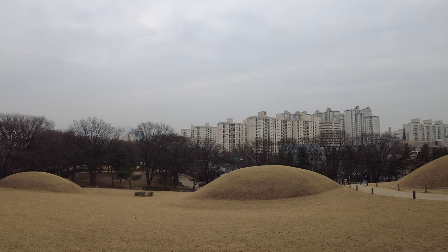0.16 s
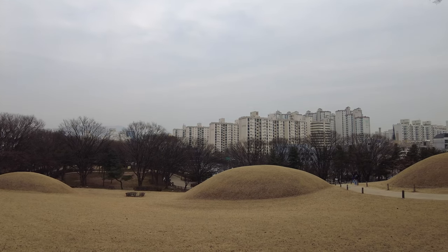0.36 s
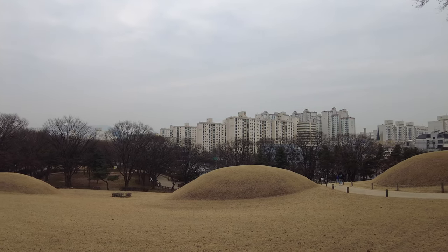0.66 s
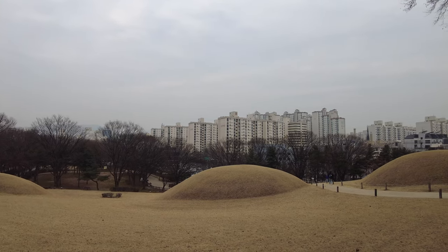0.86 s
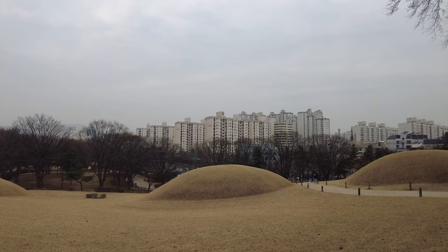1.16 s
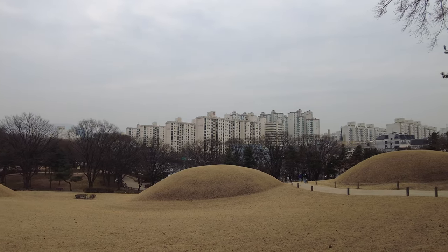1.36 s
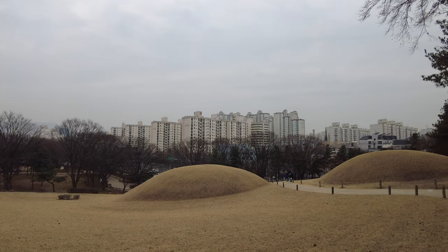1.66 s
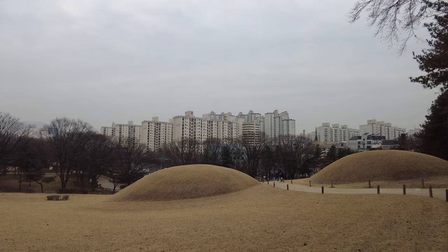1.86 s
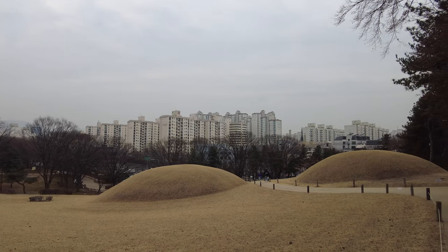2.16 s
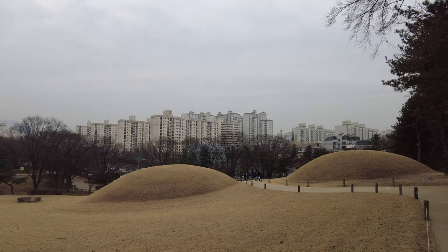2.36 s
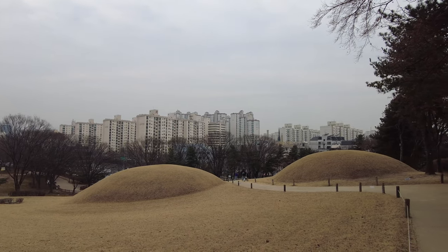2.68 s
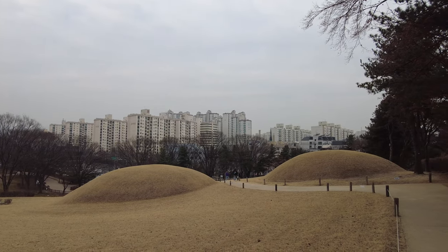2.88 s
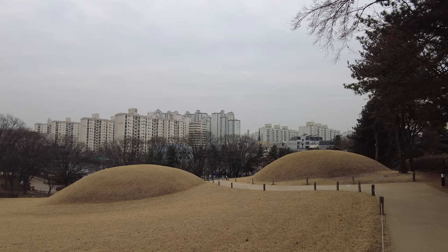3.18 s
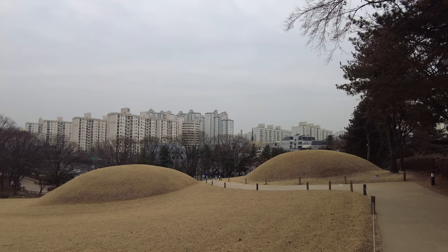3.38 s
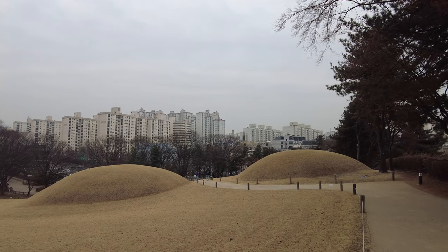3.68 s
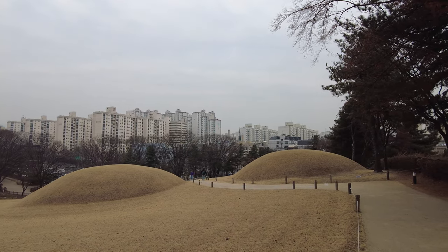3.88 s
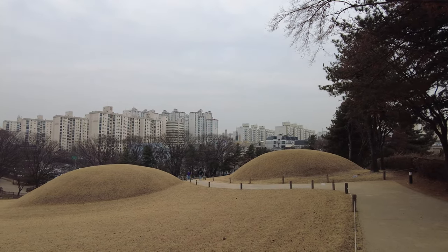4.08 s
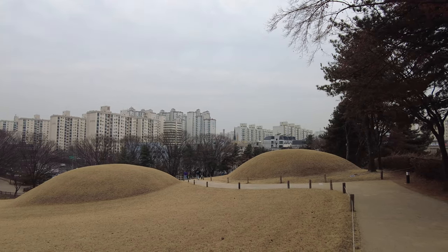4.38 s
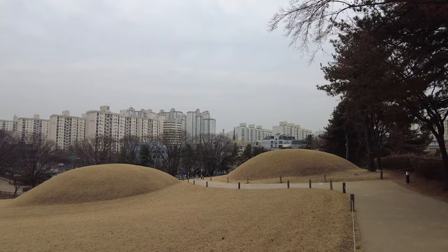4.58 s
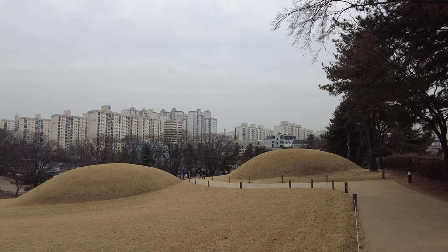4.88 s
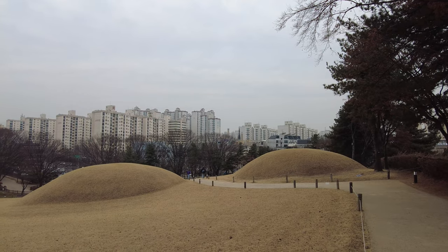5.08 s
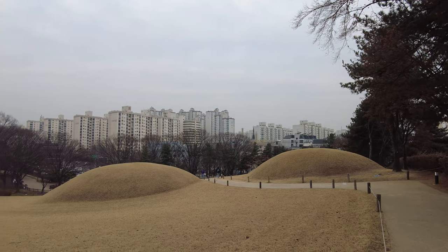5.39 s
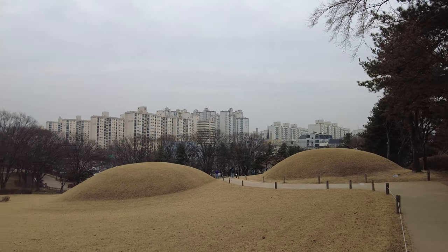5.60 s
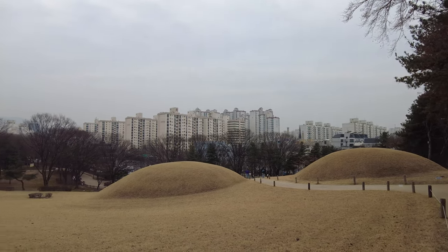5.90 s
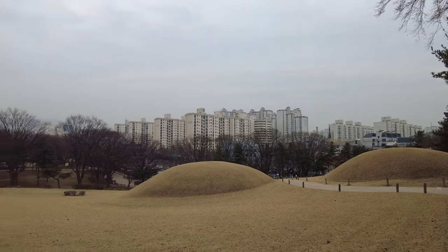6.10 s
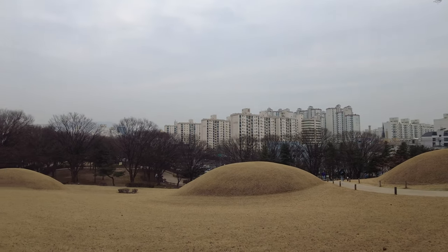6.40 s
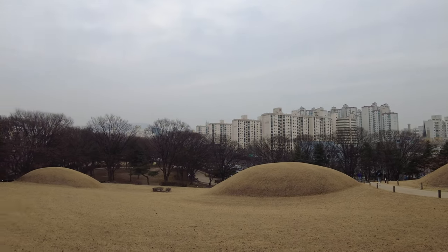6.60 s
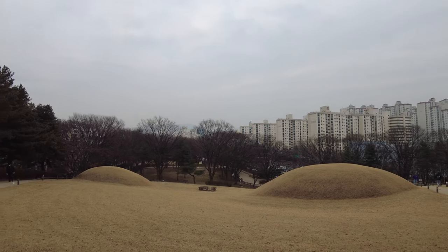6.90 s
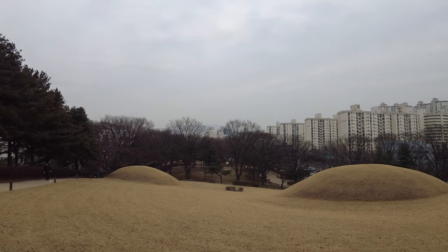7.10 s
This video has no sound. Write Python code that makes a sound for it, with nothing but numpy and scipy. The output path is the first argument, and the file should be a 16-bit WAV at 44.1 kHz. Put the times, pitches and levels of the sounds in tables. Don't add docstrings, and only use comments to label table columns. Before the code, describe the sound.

Outdoors in an open park, a hand-held stereo microphone picks up a continuous, bass-heavy rumble of distant traffic. Low engine drones flutter and fade, and the roar swells gently in the second half. A small bird whistles early; near two seconds fine metal tags jingle faintly. Sparse grit ticks, slight cloth rustle and a few short chirps follow, with soft gear whines and heavier lorry drones near the end.

```python
import sys
import numpy as np
from scipy import signal
from scipy.fft import rfft, irfft, next_fast_len
from scipy.io import wavfile
from scipy.ndimage import uniform_filter1d

SR = 44100
rng = np.random.default_rng(int(sys.argv[2]) if len(sys.argv) > 2 else 0)


def waveform_to_disk(signal):
    frames = np.transpose(np.atleast_2d(signal))
    scaled = np.clip(frames, -1, 1) * 32767
    samples = np.round(scaled).astype(np.int16)
    wavfile.write(sys.argv[1], SR, samples)


def attenuation_scalar(level_db):
    decades = np.asarray(level_db, float) / 20
    return 10 ** decades


N = 319725

# frequency in Hz, mid level in dB per Hz, side level in dB
# per Hz, share of the side in phase with the mid (-1 to 1), share in quadrature (-1 to 1).
ROAR_SPECTRUM = [(21.3, -55, -67.5, -0.82, -0.43), (35.7, -55, -72, -.9, -0.5), (43, -62, -76, -.9, -.3),
                 (62, -63, -79.5, -.6, -.3), (77.4, -63.5, -82.5, -0.19, -0.48),
                 (124, -68.5, -83, -.07, 0.64), (207, -73, -83, -0.15, -0.69),
                 (292.6, -78.5, -87.5, .03, -0.26), (485, -85.5, -90, 0, -0.4), (640, -88, -89, .2, -0.26),
                 (950, -89.5, -84.5, .16, -0.12), (1180, -93.5, -88, 0.28, -0.1),
                 (1214, -87, -94.5, 0.17, 0.1), (1696, -91, -95.5, -0.16, -0.45),
                 (2347, -101.5, -102.5, -.16, -0.7), (2925, -103, -104, -0.22, -.25),
                 (3800, -110.5, -111.5, -.12, -.1), (4300, -111.5, -110.5, -.2, 0),
                (5000, -115, -116, -.2, 0), (6700, -120.5, -121, -.13, 0), (7000, -122, -127, -.1, 0),
                (7700, -122.5, -124, -.1, 0), (8600, -124.5, -130, -.1, 0), (9400, -127, -127, -.1, 0),
                (12700, -128.5, -133, -.1, 0), (12790, -143, -138, 0, 0), (14200, -137, -131, 0, 0),
                (14330, -122, -116, -.1, .2), (14930, -121.5, -118, -.1, .2), (15020, -136, -119, 0, 0)]
# time in seconds, level in dB.
FLOW = [
    (0, -0.5),
    (.7, -1.5),
    (1.4, -1.5),
    (2.4, -0.8),
    (3.5, 0.6),
    (4.2, 0.94),
    (4.9, 0.5),
    (5.6, 1.26),
    (6.2, 1.4),
    (7.25, 1),
]
# their frequencies in Hz, then how far each follows the flow (1 = fully).
FLOW_HZ = [200, 700, 1800, 6000]
FLOW_SHARE = [0.74, 1.05, 1.3, 0.6]
# time in seconds, activity (no unit).
TREBLE_ACTIVITY = [(0, -1.2), (1.72, -1.1), (1.8, 1.2), (1.97, 1.6), (2.05, -.9), (4, -.9), (4.3, .3), (5.4, .3),
                   (5.55, 1), (5.7, .4), (6.5, .5), (6.6, 1.3), (6.75, 0), (7.0, .6), (7.25, .8)]
TREBLE_EDGES_HZ = [12750, 13500, 14250, 15000, 15720]
# start in seconds, peak in dB, left minus right in dB, pitch in Hz.
GRIT = [(1.79, -68, 0, 10000), (1.884, -67, 1, 6200), (1.93, -67, 1, 6500), (1.946, -70, 0, 9000),
        (3.148, -65, -1, 8000), (3.459, -67, 4, 5200), (3.692, -67, -2, 6500), (3.772, -68, -1, 7000),
        (4.189, -61.5, -4, 7000), (4.78, -61, -3, 6000), (4.877, -68, -1, 9000), (5.58, -66, 0, 12000),
        (5.89, -66, 0, 10500), (6.622, -63, -1, 9000)]
# start in seconds, frequency in Hz, level in dB,
# 60 dB decay in seconds, left minus right in dB.
TAGS = [
    (1.175, 11950, -77, .5, -3),
    (1.835, 10900, -75, .3, 0),
    (1.9, 13150, -82, .2, -5),
    (1.925, 11070, -69, .45, -1),
    (1.96, 12200, -68, .3, 0),
    (2.0, 11700, -76, .2, -1),
    (2.045, 13050, -79, .3, 0),
    (2.15, 12150, -75, .35, -7),
    (2.15, 10400, -86, .3, 0),
    (2.185, 13630, -83, .2, 2),
]
# start in seconds, length in seconds, frequency in Hz,
# climb in Hz per second, level in dB.
WHISTLES = [
    (.352, .134, 3410, 600, -74.5),
    (2.43, .16, 3220, 2200, -81),
    (3.595, .105, 3320, 2500, -82),
    (6.94, .15, 3250, 2300, -81),
]
BLIPS = [
    (1.59, .014, 4150, 2000, -87),
    (1.836, .022, 4060, -32000, -76),
    (4.476, .044, 4000, 12000, -68.5),
    (5.14, .09, 4230, 500, -87.5),
    (1.76, .026, 4000, -1500, -80),
    (1.608, .028, 3290, -3000, -76.5),
]
# left minus right in dB, left lag in ms, echo in dB.
PERCHES = [
    (3, 0.035, -9),
    (9.5, 0.12, -5),
    (-1, 0.1, -4),
    (0, .08, -1),
    (2, .03, -5),
    (3, 0.03, -6),
    (-1, 0.04, -3),
    (8, 0.11, 5),
    (3, .03, -5),
    (2, .03, -5),
]
# centre in seconds, length in seconds, frequency in Hz,
# level in dB, left minus right in dB.
WHINES = [(.25, 0.11, 590, -67, 5), (1.247, 0.088, 950, -68, -1), (1.801, .1, 1108, -65, -2),
          (3.564, .12, 1180, -67, 2), (4.268, .15, 970, -67, 3), (5.62, 0.1, 755, -64, 0),
          (5.681, .12, 1066, -68, 0), (5.861, .18, 1195, -66, -4), (6.063, 0.054, 855, -61, 3),
          (6.322, 0.1, 856, -62, 4), (6.45, .25, 417, -69, 6), (6.565, .09, 958, -61, 0),
          (6.74, 0.08, 980, -63, 0), (5.7, .07, 800, -62.5, 3), (5.67, .05, 855, -61, 5),
          (5.765, .06, 590, -64.5, 3), (5.897, .06, 1210, -64, -1), (5.91, .1, 790, -66, 2),
          (6.02, .08, 920, -61, 2), (6.1, .06, 1090, -66, -2), (6.25, .06, 670, -60, 1),
          (6.456, .06, 835, -65, -2), (6.64, .05, 960, -66, 0), (2.325, .05, 700, -63.5, -1),
          (.955, .04, 898, -61.5, 0)]
# start in seconds, length in seconds, firing rate in Hz,
# climb in Hz per second, level in dB.
PASSES = [(2.1, 0.47, 200, -40, -54.5), (2.7, 0.4, 195, 11.5, -56), (3.9, .3, 190, 0, -58.5),
          (4.0, .25, 290, 0, -59), (3.6, .8, 87.3, 10.5, -49), (4.55, 1.2, 101, 1.5, -48.5),
          (3.33, .3, 98, 71, -50), (0.594, 0.69, 62, 16.5, -48), (1.18, 1.4, 85, 0.5, -52.5),
          (0.23, 1.6, 169.7, 3.5, -60), (6.25, 0.3, 310, -5.5, -60), (5.95, .35, 270, 22, -58),
          (6.4, 0.22, 68, 0, -46), (6.25, 0.42, 79, 2, -48.5), (2.3, 1.3, 73, -1, -53.5),
          (4.95, .5, 70, 5.5, -48), (0.89, .3, 117, 6, -52)]
LORRIES = [
    (6.44, 0.67, 61.3, 1.5, -41),
    (5.95, 0.22, 51, 54, -42.5),
    (6.22, .2, 57.5, -10, -44),
    (7.0, 0.11, 57.6, -1, -37),
    (7.13, .17, 57.2, -1, -37),
]
# order (multiple of the firing rate), level in dB.
LORRY_ORDERS = [(1, -11.5), (2, -2), (4, -18.5)]
# time in seconds, firing rate in Hz, level in dB.
BUS = [(0, 46.4, -32), (.4, 45.87, -28), (1.0, 45.27, -30.5), (1.3, 45.73, -35.1), (1.7, 46.2, -30.5),
       (2.0, 49.56, -33.5), (3.05, 52.74, -30.5), (3.42, 52.25, -29.5), (3.9, 54.6, -26.2),
       (4.2, 49.4, -28), (4.6, 50.6, -24.5), (5.0, 48.7, -30), (5.4, 49.6, -27), (5.85, 52.2, -29),
       (6.2, 51, -38.5), (6.6, 53.68, -31), (6.9, 55.04, -37.5), (7.25, 56.8, -32.5)]
# centre in seconds, half width in seconds, depth in dB.
SHADOWS = [(0.189, 0.025, 12.5), (0.464, 0.026, 5.0), (0.56, 0.044, 3.0), (0.804, 0.065, 7.6),
           (1.056, 0.017, 4.9), (1.124, 0.028, 5.7), (1.342, 0.012, 2.8), (1.459, 0.02, 12.5),
           (1.823, 0.066, 12.5), (1.891, 0.013, 12.5), (1.958, 0.058, 12.5), (2.31, 0.038, 10.6),
           (2.422, 0.018, 5.7), (2.526, 0.062, 8.9), (2.677, 0.021, 11.5), (2.73, 0.029, 12.5),
           (2.837, 0.02, 12.5), (3.133, 0.019, 10.5), (3.189, 0.033, 6.6), (3.269, 0.015, 8.9),
           (3.32, 0.071, 15.3), (3.485, 0.032, 12.5), (3.612, 0.027, 9.5), (3.742, 0.082, 5.7),
           (3.921, 0.033, 11.5), (3.988, 0.031, 20.0), (4.092, 0.024, 5.1), (4.164, 0.013, 12.5),
           (4.198, 0.054, 11.5), (4.292, 0.037, 11.5), (4.416, 0.063, 11.5), (4.539, 0.034, 11.5),
           (4.654, 0.045, 11.5), (4.768, 0.04, 12.5), (4.864, 0.066, 6.7), (5.009, 0.035, 8.8),
           (5.092, 0.035, 12.5), (5.22, 0.027, 5.3), (5.317, 0.043, 9.7), (5.523, 0.099, 10.5),
           (5.628, 0.037, 12.5), (5.685, 0.047, 11.5), (5.77, 0.02, 8.5), (5.965, 0.066, 5.4),
           (6.037, 0.015, 8.7), (6.097, 0.012, 12.5), (6.161, 0.012, 12.5), (6.222, 0.034, 7.3),
           (6.351, 0.04, 12.5), (6.45, 0.014, 12.5), (6.484, 0.017, 12.5), (6.515, 0.012, 11.5),
           (6.602, 0.065, 11.5), (6.696, 0.028, 12.5), (6.821, 0.012, 12.5), (6.873, 0.023, 11.5),
           (6.924, 0.02, 12.5), (7.019, 0.015, 12.5), (7.078, 0.015, 8.6), (7.237, 0.023, 11.5)]


def curve(s, values):
    return np.interp(np.arange(N) / SR, s, values)


def walk(rate):
    k = int(SR / rate)
    held = np.repeat(rng.standard_normal(N // k + 1), k)
    return 1.297 * uniform_filter1d(uniform_filter1d(held, k), k)[:N]


def place(x, pan_db, lag_s):
    t = np.arange(N)
    left = np.interp(t - lag_s * SR, t, x)
    return np.array([attenuation_scalar(pan_db / 2) * left, attenuation_scalar(-pan_db / 2) * x])


def port_db(pan_db):
    return np.array([[pan_db], [-pan_db]]) / 2


def gate(s, fade_s):
    return curve([s[0] - fade_s, s[0], s[-1], s[-1] + fade_s], [0, 1, 1, 0])


def roar(flicker_db=1.0, stir_db=.6):
    size = next_fast_len(N)
    hz = np.fft.rfftfreq(size, 1 / SR) + 1e-3
    f, *columns = np.transpose(ROAR_SPECTRUM)
    mid_db, side_db, same, quad = (np.interp(np.log(hz), np.log(f), c) for c in columns)
    edges = np.clip(hz / 16, 0, 1) ** 2 * (hz < 15720)
    a, b = rfft(rng.standard_normal((2, size))) * np.sqrt(SR / 2) * edges
    tie = same + 1j * quad
    tie = tie / np.maximum(np.abs(tie), 1)
    own = np.sqrt(np.clip(1 - np.abs(tie) ** 2, 0, 1))
    mid = attenuation_scalar(mid_db) * a
    side = attenuation_scalar(side_db) * (tie * a + own * b)
    ports = np.array([mid + side, mid - side])
    flow = curve(*np.transpose(FLOW))
    stir = walk(20) + curve(*np.transpose(TREBLE_ACTIVITY))
    out = 0
    for octave in np.arange(4, 14.5, .5):
        share = np.clip(1 - 2 * np.abs(np.log2(hz) - octave), 0, 1)
        db = np.interp(octave, np.log2(FLOW_HZ), FLOW_SHARE) * flow + flicker_db * walk(14)
        db = db + stir_db * stir * np.clip(octave - 12.1, 0, 1) * (octave < 14)
        out = out + attenuation_scalar(db) * irfft(ports * share, size)[:, :N]
    return out


def treble_flicker(db_per_hz=-134.5, burst_db=4.0, own=1.1):
    hz = np.fft.rfftfreq(N, 1 / SR)
    noise = rfft(rng.standard_normal(N)) * np.sqrt(SR / 2)
    activity = walk(45) + curve(*np.transpose(TREBLE_ACTIVITY))
    out = 0
    for low, high in zip(TREBLE_EDGES_HZ, TREBLE_EDGES_HZ[1:]):
        level_db = db_per_hz + burst_db * (activity + own * walk(40))
        out = out + attenuation_scalar(level_db) * irfft(noise * (hz > low) * (hz < high), N)
    return out


def grit(decay_s=.002, spread=1.45):
    out, t = np.zeros((2, N)), np.arange(1024) / SR
    chance = rng.standard_normal((len(GRIT), 2, len(t)))
    for (s, db, pan_db, hz), noise in zip(GRIT, chance):
        band_hz = [hz / spread, min(hz * spread, 16000)]
        band = signal.butter(2, band_hz, "bandpass", fs=SR, output="sos")
        crack = signal.sosfilt(band, (.5 * noise[0] + noise) * np.exp(-t / decay_s))
        i = int(s * SR)
        out[:, i:i + len(t)] += crack / np.abs(crack).max() * attenuation_scalar(db + port_db(pan_db))
    return out


def tags(rise_s=.008, damped_s=.095, swing_db=3.5, drift=.005, lag_ms=.025):
    out, t = np.zeros((2, N)), np.arange(int(.2 * SR)) / SR
    swing, sway = walk(90), walk(70)
    for s, hz, db, t60, pan_db in TAGS:
        i = int(s * SR)
        span = slice(i, i + len(t))
        phase = 2 * np.pi * hz * np.cumsum(1 + drift * sway[span]) / SR
        ports = np.sin(phase - 2 * np.pi * hz * np.array([[lag_ms], [0]]) / 1000)
        size = (1 - np.exp(-t / rise_s)) * attenuation_scalar(db - 60 * t / t60 + swing_db * swing[span])
        size = size / (1 + (t / damped_s) ** 8)
        out[:, span] += ports * size * attenuation_scalar(port_db(pan_db))
    return out


def whistle(s, length, hz, climb, db):
    hook_s, hook_hz, fall_hz, ends_db = .017, 220, 450, -5
    top = hz + climb * length
    end = s + length
    return [(s, hz - hook_hz, db + ends_db),
            (s + hook_s, hz, db + 1.5),
            (s + 2 * hook_s, hz, db - 4),
            (s + length / 2, (hz + top) / 2, db - 9),
            (end - 1.2 * hook_s, top, db - 1),
            (end - .5 * hook_s, top - .6 * fall_hz, db + 2),
            (end, top - fall_hz, db + ends_db)]


def blip(s, length, hz, climb, db):
    shape = [(0, -10), (.4, 0), (.8, -1), (1, -5)]  # (share of the length, dB)
    return [(s + u * length, hz + climb * length * u * (1 - u / 4), db + d) for u, d in shape]


def birds(flutter_db=1.5, echo_s=.16):
    out = np.zeros((2, N))
    t = np.arange(int(.2 * SR)) / SR
    calls = [whistle(*row) for row in WHISTLES] + [blip(*row) for row in BLIPS]
    for call, (pan_db, lag_ms, echo_db) in zip(calls, PERCHES):
        s, hz, db = np.transpose(call)
        tone = np.sin(2 * np.pi * np.cumsum(curve(s, hz)) / SR)
        tone = np.sqrt(2) * tone * attenuation_scalar(curve(s, db) + flutter_db * walk(90)) * gate(s, .006)
        trunks = rng.standard_normal((2, len(t))) * attenuation_scalar(-60 * t / echo_s)
        trunks *= attenuation_scalar(echo_db) / np.sqrt(np.sum(trunks ** 2, axis=1, keepdims=True))
        out += place(tone, pan_db, lag_ms / 1000)
        out += signal.fftconvolve(tone[None], trunks, axes=1)[:, :N]
    return out


def whines(wobble=0.016, flutter_db=3.5, lag_s=2e-4):
    out, t = np.zeros((2, N)), np.arange(N) / SR
    air = np.cumsum(1 + wobble * walk(25)) / SR
    flutter = attenuation_scalar(flutter_db * walk(35))
    for s, length, hz, db, pan_db in WHINES:
        near = np.abs(t - s) < 2 * length
        size = np.sqrt(2) * flutter[near] * np.exp(-(2 * (t[near] - s) / length) ** 2)
        ports = np.sin(2 * np.pi * hz * (air[near] - np.array([[lag_s], [0]])))
        out[:, near] += size * ports * attenuation_scalar(db + port_db(pan_db))
    return out


def engine(table, orders, wobble=0.01199, shimmer_db=0.3):
    s, hz, *levels = np.transpose(table)
    phase = 2 * np.pi * np.cumsum(curve(s, hz) * (1 + wobble * walk(6))) / SR
    tones = 0
    for order, db in zip(orders, levels):
        tones = tones + attenuation_scalar(curve(s, db) + shimmer_db * walk(12)) * np.cos(order * phase)
    return np.sqrt(2) * tones * gate(s, 0.019)


def passing(s, length, hz, climb, db, orders_db=(0,)):
    shape = [(0, -8), (.3, 0), (1 - .3, 0), (1, -8)]  # (share of the pass, dB)
    return [(s + u * length, hz + climb * u * length, *(db + d + o for o in orders_db)) for u, d in shape]


def shadow(t, s, width, db):
    u = (t - s) / width
    dip = 1 - (1 - attenuation_scalar(-db)) * np.exp(-u ** 2)
    return dip * (np.tanh(2 * u) if db > 12 else 1)


def traffic():
    t = np.arange(0, N / SR, .002)
    clear = curve(t, np.prod([shadow(t, *row) for row in SHADOWS], axis=0))
    drone = clear * engine(BUS, orders=[1])
    for row in PASSES:
        drone = drone + engine(passing(*row), orders=[1], wobble=.017, shimmer_db=2.0)
    orders, orders_db = np.transpose(LORRY_ORDERS)
    for row in LORRIES:
        lorry = passing(*row, orders_db)
        drone = drone + engine(lorry, orders=np.round(orders), wobble=0.01204, shimmer_db=1.5)
    return place(drone, pan_db=-2, lag_s=5e-5)


def scene():
    return roar() + treble_flicker() + grit() + tags() + birds() + whines() + traffic()


def band_limit(x):
    return signal.sosfilt(signal.butter(12, 15720, fs=SR, output="sos"), x)


def record(dry):
    return band_limit(dry)


dry = scene()
out = record(dry)
waveform_to_disk(out)
```